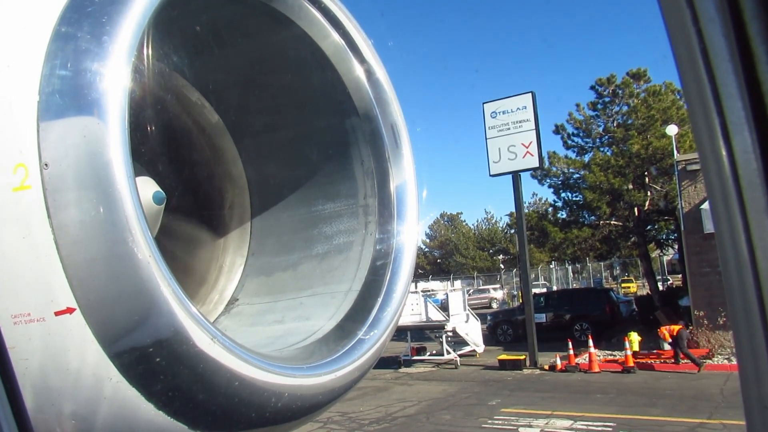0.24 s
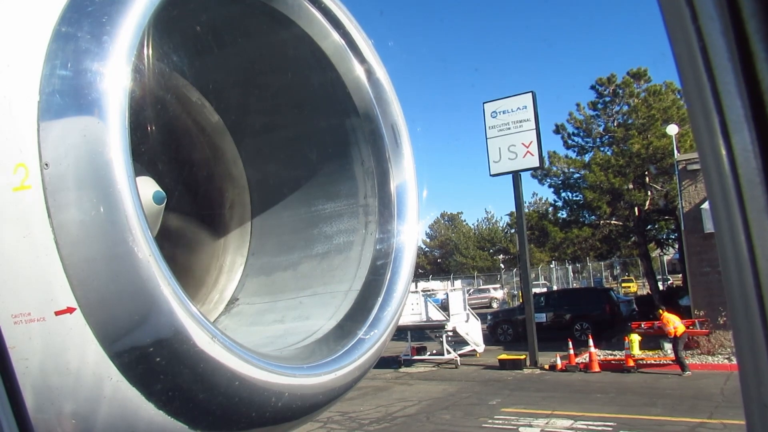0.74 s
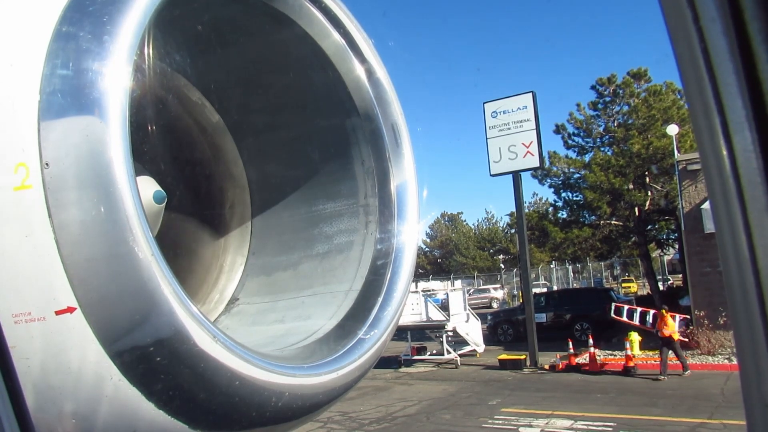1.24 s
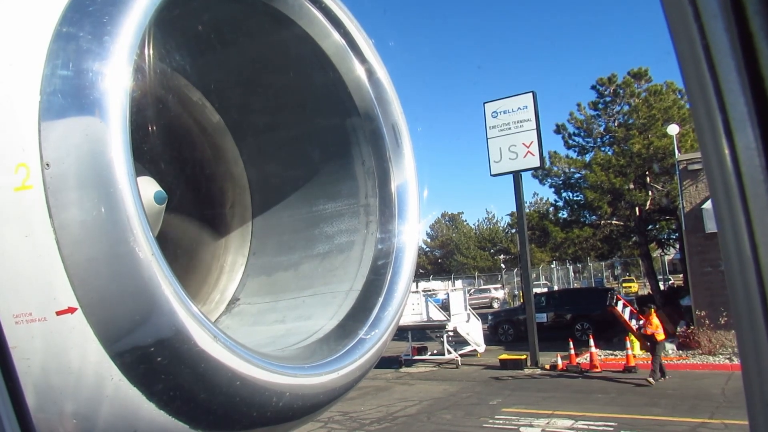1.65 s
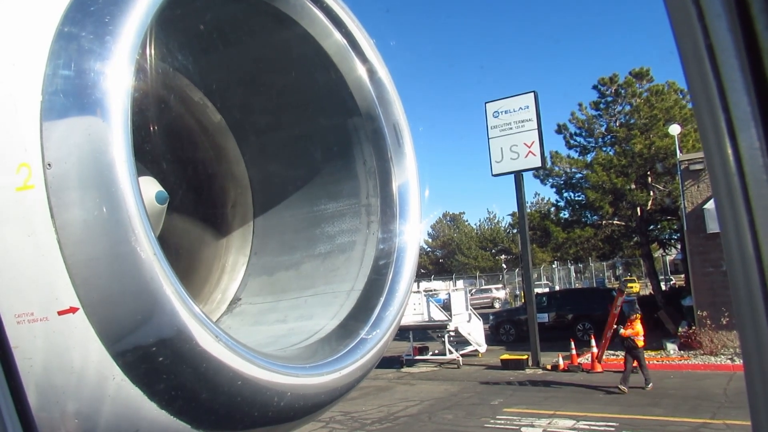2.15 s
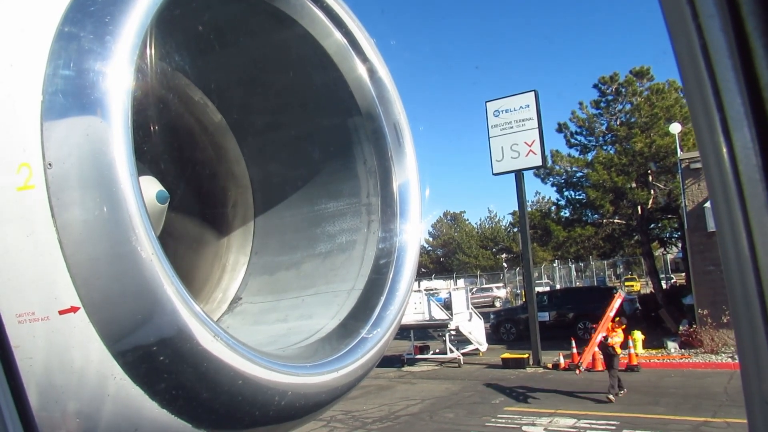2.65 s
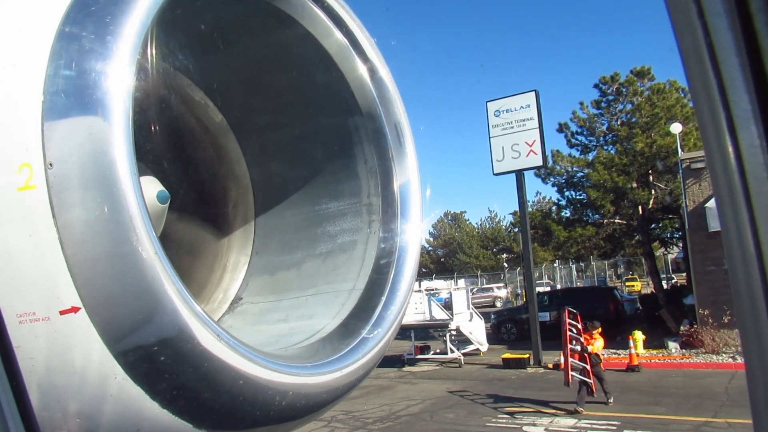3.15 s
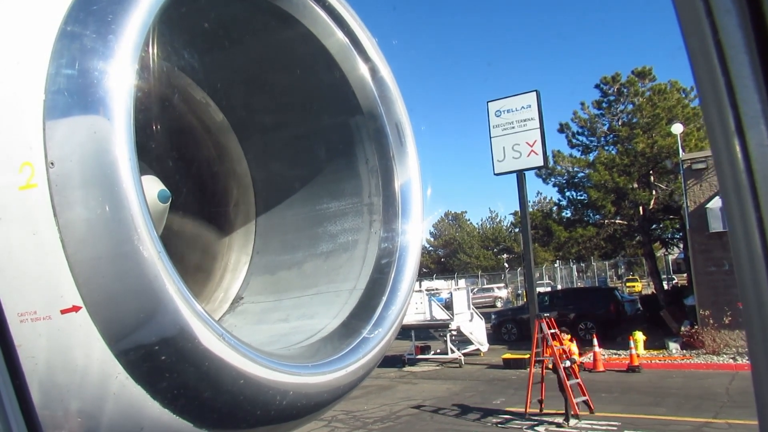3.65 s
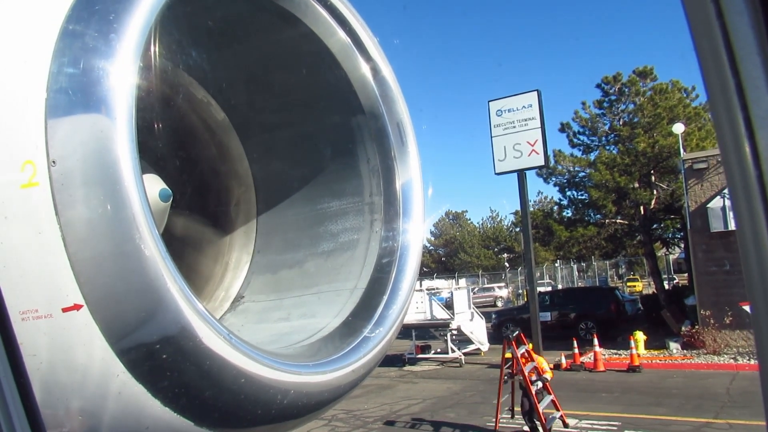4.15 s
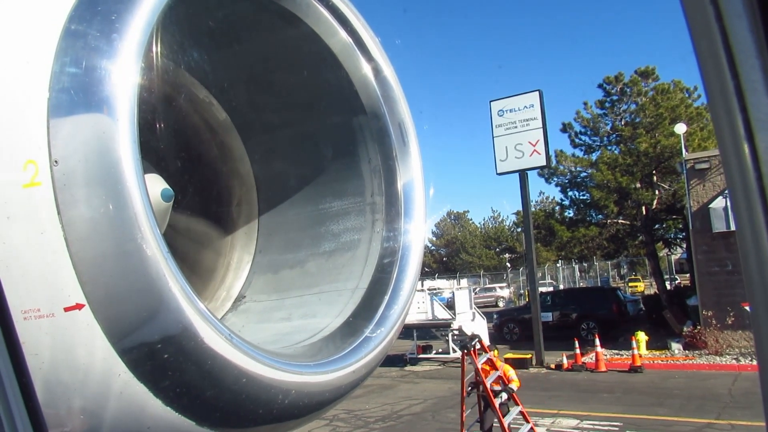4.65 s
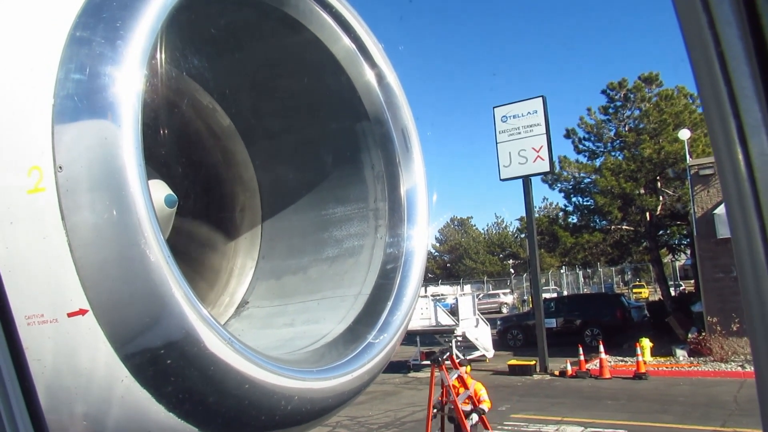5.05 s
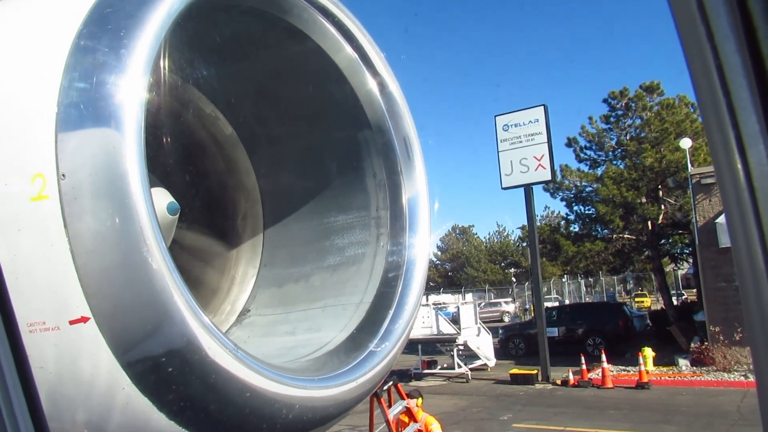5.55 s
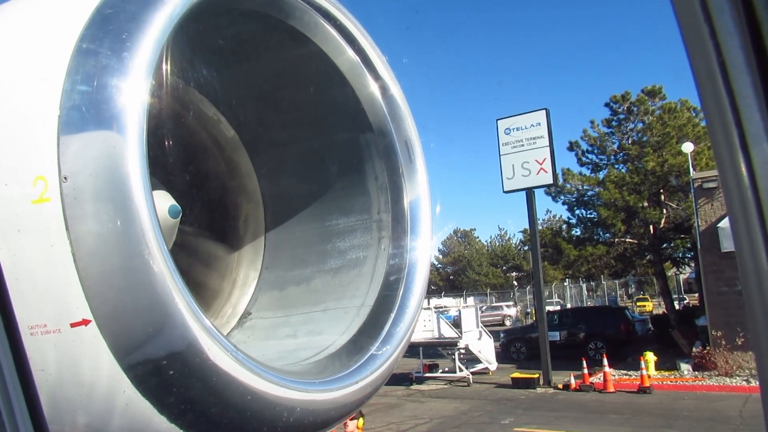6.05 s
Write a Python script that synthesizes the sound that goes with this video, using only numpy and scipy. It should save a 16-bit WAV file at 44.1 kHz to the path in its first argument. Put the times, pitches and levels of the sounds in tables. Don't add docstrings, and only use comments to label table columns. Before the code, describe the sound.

From a cabin window seat beside a rear jet engine just switched off, layered whining tones glide downward, swelling and fading as the cabin shell resonates. Low rumble, fan hum and soft vent hiss continue underneath. Small trim and buckle ticks come early; near the middle a latch snaps and bounces with a floor thud, then a heavier thud follows late. The phone microphone is close, stereo and slightly dull on top.

```python
import sys
import numpy as np
from scipy import signal
from scipy.fft import rfft, irfft
from scipy.io import wavfile

SR = 44100
rng = np.random.default_rng(int(sys.argv[2]) if len(sys.argv) > 2 else 0)


def ratio_of_db(decibels):
    return 10 ** (np.asarray(decibels, float) / 20)


def store_wav(level_fs):
    pcm = np.round(np.clip(np.atleast_2d(level_fs), -1, 1) * 32767)
    wavfile.write(sys.argv[1], SR, pcm.T.astype(np.int16))


N = 278271
TIME_S = np.arange(N) / SR


def pan(db):
    return ratio_of_db(np.array([[db], [-db]]) / 2)


def walk(rate):
    knots = rng.standard_normal(int(N / SR * rate) + 2)
    return 1.44 * np.interp(np.arange(N) * rate / SR, np.arange(len(knots)), knots)


def band(x, hz, width_hz):
    return signal.lfilter(*signal.iirpeak(hz, hz / width_hz, SR), x)


def humps(rows):
    return np.max([db * np.exp(-(2 * (TIME_S - s) / length) ** 2) for s, db, length in rows], axis=0)


def add(out, start_s, sound):
    start = int(start_s * SR)
    out[:, start:start + sound.shape[1]] += sound


def pump_rate():
    start_hz, coast_s, friction_hz = 110.15, 20.6, 5.85
    return (start_hz + friction_hz) * np.exp(-TIME_S / coast_s) - friction_hz


def turned(rate):
    return 2 * np.pi * np.cumsum(rate) / SR


# pitch_hz, width_hz, left_level_db, left_phase_rad, right_level_db, right_phase_rad
SHELL = [(167.4, 7.0, -46.2, 2.01, -47.1, 1.76), (184.9, 7.0, -51.6, 2.73, -51.8, 2.36),
         (201.3, 44.3, -49.6, -1.64, -52.8, -1.41), (212.0, 7.0, -72.0, -3.01, -53.5, 2.66),
         (280.5, 9.4, -55.3, -2.04, -66.8, -2.34), (302.6, 12.9, -55.2, -0.65, -55.7, -0.89),
         (323.0, 17.0, -45.7, -2.98, -45.8, 2.55), (337.0, 19.9, -51.1, -2.16, -52.6, -1.36),
         (351.4, 14.5, -38.4, -0.95, -44.7, -1.98), (369.0, 16.5, -43.2, 0.19, -49.2, -1.03),
         (387.0, 10.0, -59.0, 0.38, -59.0, -0.03), (408.0, 31.6, -51.9, 0.41, -53.6, -0.54),
         (430.2, 18.7, -51.1, 1.48, -61.6, 0.27), (463.0, 50.0, -65.0, 1.77, -59.5, 0.33),
         (520.7, 50.0, -58.1, -2.36, -57.7, 0.89), (552.0, 50.0, -52.9, 0.38, -76.0, 2.02)]


def shell(hz):
    pitch, width, left_db, left_rad, right_db, right_rad = np.transpose(SHELL)
    ports = ratio_of_db(np.array([left_db, right_db])) * np.exp(1j * np.array([left_rad, right_rad]))
    return ports @ (1 / (1 + 2j * (hz - pitch[:, None]) / width[:, None]))


# multiple_of_pump_shaft, level_db
PUMP_TONES = [(14, 0), (21, 3), (28, 0), (35, -5), (42, -14), (23, -13), (24, -24), (25, -22), (26, -17),
              (27, -24), (29, -22), (30, -15), (37, -16)]


def pump(rate):
    pistons = 7
    turn = turned(rate)
    coarse = np.arange(0, N, 256)
    out = 0
    for multiple, db in PUMP_TONES:
        order = round(multiple) / pistons
        answer = np.array([np.interp(np.arange(N), coarse, port) for port in shell(order * rate[coarse])])
        tone = np.exp(1j * (order * turn + 2 * np.pi * rng.random()))
        out = out + ratio_of_db(db + .5 * walk(6.7)) * (answer * tone).real
    return np.sqrt(2) * out


# multiple_of_pump_rate, start_level_db, end_level_db, left_minus_right_db
SHAFTS = [(.3045, -56, -55, -3), (1.0, -57, -54.5, -2)]


def shafts(rate):
    rail_hz, rail_width_hz, rail_db = 28.7, 4.2, 6
    turn, out = turned(rate), 0
    for multiple, start_db, end_db, pan_db in SHAFTS:
        rails = rail_db / (1 + (2 * (multiple * rate - rail_hz) / rail_width_hz) ** 2)
        level_db = np.linspace(start_db, end_db, N) + rails + 1.5 * walk(2.81)
        out = out + ratio_of_db(level_db) * pan(pan_db) * np.sin(multiple * turn)
    return np.sqrt(2) * out


# multiple_of_pump_rate, level_db, left_minus_right_db
WHINE = [(8.0, -85, 0), (9.0, -87, -2), (10.25, -91, -4), (11.47, -88, -5)]


def whine(rate):
    turn, out = turned(rate), 0
    for multiple, db, pan_db in WHINE:
        tone = np.sin(multiple * turn + 2 * np.pi * rng.random((2, 1)))
        out = out + ratio_of_db(db + 2 * walk(0.76)) * pan(pan_db) * tone
    return np.sqrt(2) * out


# pitch_hz, level_db, left_minus_right_db, left_lead_rad, wander_hz
HUMS = [(260.1, -63.5, -1.5, .5, .8), (520.0, -75, -4, 1.6, 1.5), (616.7, -62, 4.5, -2.3, .5),
        (678.6, -81, 0, -.4, .4), (824.1, -76.5, 2.5, -2.8, .4), (1057.0, -79.5, -6, 1.2, .5),
        (1300.1, -82, 2, 2.9, .4), (1357.3, -85, 2, .3, .5), (1648.1, -83, -2, 1.4, .5),
        (5377.1, -78.7, 2.5, -1.8, .1), (7038.7, -94, -4, 0, .2), (10754.0, -83, -4.5, -.6, .3)]


def hums():
    tilt_s, tilt_takes_s, tilt_db = 4.85, .1, 3
    tilt = tilt_db * (1 + np.tanh((TIME_S - tilt_s) / tilt_takes_s)) / 2
    out = 0
    for hz, db, pan_db, lead, wander_hz in HUMS:
        turn = turned(hz + wander_hz * walk(8))
        level_db = db + .3 * walk(2)
        if 5000 < hz < 6000:
            level_db = level_db + tilt
        out = out + ratio_of_db(level_db) * pan(pan_db) * np.sin(turn + np.array([[lead], [0]]))
    return np.sqrt(2) * out


# pitch_hz, left_level_db (per Hz), right_level_db (per Hz), likeness of the ports (-1 to 1)
AIR = [(18, -73, -73, 0.87), (48, -74, -75.5, 1), (134, -74.5, -73.5, 0.91), (238, -76.5, -79, 0.72),
       (311, -85, -80, 0.25), (420, -84.5, -91, 0.62), (752, -89.5, -90, -0.71), (940, -99.5, -92.5, 0.066),
       (1850, -100.5, -96.5, 0.0069), (3650, -106, -102.5, 0.062), (4770, -106, -105, -0.23),
       (6600, -108.5, -104.5, -0.0052), (9600, -111, -105.5, -0.033), (16000, -113.5, -106.5, -0.11)]
# pitch_hz, width_hz, left_level_db, right_level_db
BOOMS = [(74.3, 19.5, 7, 11), (99.4, 13.3, 7, 9), (176.4, 41, 2.5, 5), (205, 7, 2, 5.5), (1417, 190, 6, 0),
         (5760, 510, 4, 2.5)]
# middle_s, level_db (lift of the booms), length_s
GUSTS = [
    (.19, 4.5, .2),
    (.56, 2.5, .2),
    (.88, 2.5, .15),
    (1.11, 4.5, 0.11),
    (2.17, 3, 0.37),
    (2.9, 1.5, 0.23),
    (3.44, 5, 0.16),
    (4.01, 8, 0.1),
    (4.45, 5, .5),
    (5.86, 0, 0.19),
]


def air():
    calm_db = -2
    f = np.fft.rfftfreq(N, 1 / SR) + 1
    hz, *columns = np.transpose(AIR)
    left_db, right_db, like = (np.interp(np.log(f), np.log(hz), c) for c in columns)
    lift_db = sum(np.array([[left], [right]]) / (1 + (2 * (f - centre) / width) ** 2)
                  for centre, width, left, right in BOOMS)
    like = np.clip(like, -.99, .99)
    mid, side = rfft(rng.standard_normal((2, N))) * np.sqrt([(1 + like) / 2, (1 - like) / 2])
    level = ratio_of_db(np.array([left_db, right_db]) + lift_db) * np.sqrt(SR / 2)
    ports = np.array([mid + side, mid - side]) * level
    ports = ports * np.minimum(f / hz[0], 1) ** 2
    boom_db, gust, out = calm_db + humps(GUSTS), walk(3.4), 0
    for octave in np.arange(3.5, 15):
        share = np.cos(np.pi / 2 * np.clip(np.log2(f) - octave, -1, 1)) ** 2
        shaken = np.exp(-(octave - np.log2(90)) ** 2)
        level_db = shaken * boom_db + .15 * gust + .25 * walk(1.2)
        out = out + ratio_of_db(level_db) * irfft(ports * share, N)
    return out


# middle_s, level_db (over the still floor), length_s
STEPS = [
    (0.02, 21, .2),
    (1.05, 19, 0.27),
    (2.38, 18, .35),
    (3.1, 16, .9),
    (3.75, 19.5, 0.45),
    (4.08, 22.5, 0.67),
    (4.66, 20, .15),
    (5.45, 24, 0.59),
]
# start_s, level_db, pitch_hz, fade_s (to -60 dB), direction of the first swing (-1 or 1)
THUDS = [(3.884, -35, 36, .12, -1), (3.986, -35, 40, .08, -1), (4.004, -33, 62, .1, 1),
         (4.02, -26.5, 44, .13, 1), (4.056, -29.5, 15, .3, 1), (4.2, -36, 24, .15, -1),
         (4.645, -38, 40, .12, 1), (5.338, -23.5, 43, .15, 1), (5.432, -27, 15, .45, 1),
         (5.553, -33, 46, .25, 1), (5.381, -33, 30, .1, 1)]


def floor():
    still_floor_db = -65.5
    shake = band(band(rng.standard_normal(N), 17, 14), 17, 14)
    out = shake / shake.std() * ratio_of_db(still_floor_db + humps(STEPS))
    for start_s, db, hz, fade_s, swing in THUDS:
        t = np.clip(TIME_S - start_s, 0, None)
        soft_blow = np.tanh(7.4 * hz * t)
        out = out + np.sign(swing) * ratio_of_db(db - 60 * t / fade_s) * soft_blow * np.sin(2 * np.pi * hz * t)
    return out * pan(-1.0)


def rattle(hz, width_hz, fade_s, noise):
    rise_s = .0015
    t = np.arange(noise.shape[1]) / SR
    ring = band(band(noise, hz, width_hz), hz, width_hz)
    return ring / ring.std() * (1 - np.exp(-t / rise_s)) * ratio_of_db(-60 * t / fade_s)


# pitch_hz, width_hz, level_db, fade_s (to -60 dB)
TRIM = [(1100, 400, -1, .18), (1900, 900, 1.5, .18), (3050, 450, -4, .13), (2230, 60, -18, .6)]
BUCKLE = [(7600, 5500, -2.5, 0.16), (10500, 5600, 0, 0.15), (14300, 2800, -3, 0.12)]
PIN = [(7100, 700, 0, .1), (11500, 3000, -4, .12)]
# start_s, level_db, brightness (dB per octave)
TRIM_TICKS = [
    (.1915, -53.5, 0),
    (1.245, -65, 0),
    (3.992, -62, 0),
    (5.438, -58, -6),
]
BUCKLE_TICKS = [
    (1.3455, -54, 0),
    (2.935, -72, 0),
    (2.985, -70, 0),
    (5.855, -70, 0),
]
PIN_TICKS = [
    (.198, -64, -8),
    (.576, -61.5, -3),
]


def ticks():
    out = np.zeros((2, N))
    for part, strikes in ((TRIM, TRIM_TICKS), (BUCKLE, BUCKLE_TICKS), (PIN, PIN_TICKS)):
        for start_s, tick_db, bright_db in strikes:
            noise = rng.standard_normal((2, SR // 4))
            for hz, width_hz, db, fade_s in part:
                colour_db = db + bright_db * np.log2(hz / part[0][0])
                ring = rattle(hz, width_hz, fade_s, noise)
                add(out, start_s, ratio_of_db(tick_db + colour_db) * pan(-6.5) * ring)
    return out


# (to -60 dB, before each touch shortens it to 0.65)
LATCH = [(800, 420, -12.5, 0.23), (1060, 130, -8, .2), (1510, 390, -5, 0.2), (1750, 580, -5, 0.15),
         (2480, 260, 3, 0.15), (4460, 1130, -11.5, 0.13), (6100, 970, -10.5, 0.12),
         (9200, 3000, -7.5, 0.079), (13100, 3500, -11.5, 0.12)]
# start_s (after the strike), level_db
BOUNCES = [
    (0, 0.5),
    (.009, -6.5),
    (.019, -9.5),
]


def latch():
    strike_s, strike_db, pan_db = 4.0125, -42, -5.5
    size, out = SR // 4, np.zeros((2, N))
    for late_s, bounce_db in BOUNCES:
        noise = 0.53 * rng.standard_normal(size) + 0.66 * rng.standard_normal((2, size))
        ring = sum(ratio_of_db(db) * rattle(hz, width_hz, 0.65 * fade_s, noise) for hz, width_hz, db, fade_s in LATCH)
        add(out, strike_s + late_s, ratio_of_db(strike_db + bounce_db) * pan(pan_db) * ring)
    return out


def scene():
    rate = pump_rate()
    engine = pump(rate) + shafts(rate) + whine(rate)
    return engine + hums() + air() + floor() + ticks() + latch()


def low_pass(x):
    return signal.sosfilt(signal.butter(12, 15760, fs=SR, output="sos"), x)


def record(dry):
    top_hz = 15830
    mix = signal.sosfilt(signal.ellip(10, .2, 60, top_hz, fs=SR, output="sos"), dry)
    return low_pass(mix)


dry = scene()
out = record(dry)
store_wav(out)
```